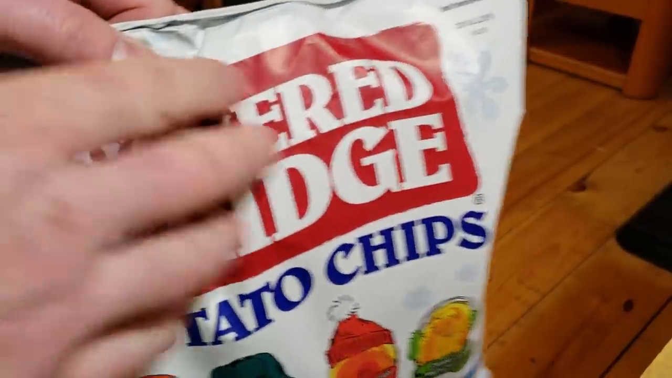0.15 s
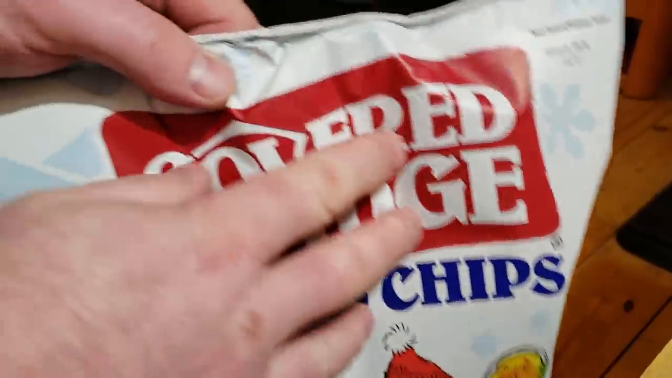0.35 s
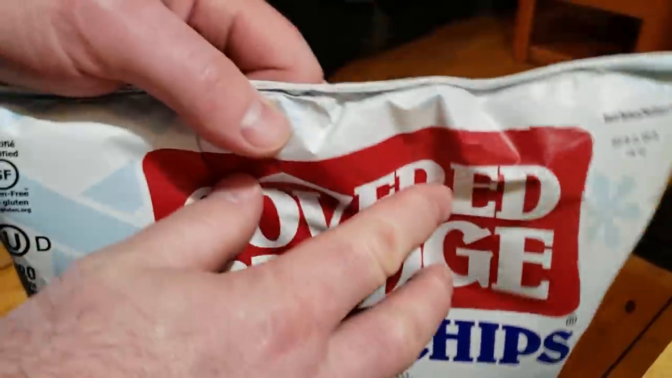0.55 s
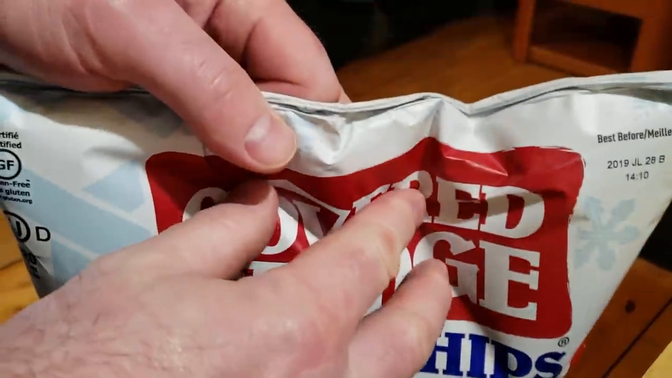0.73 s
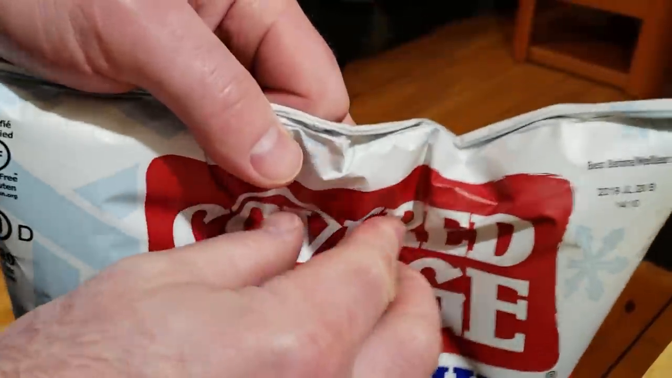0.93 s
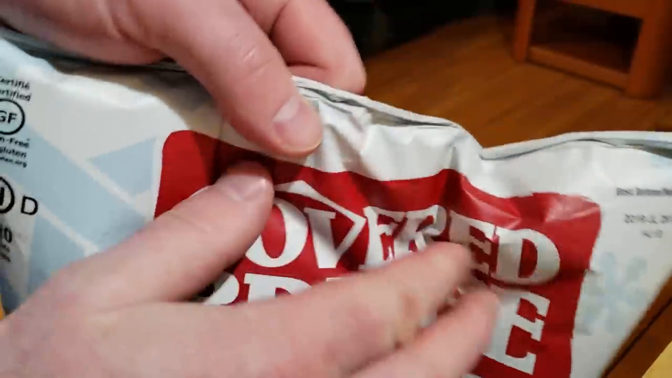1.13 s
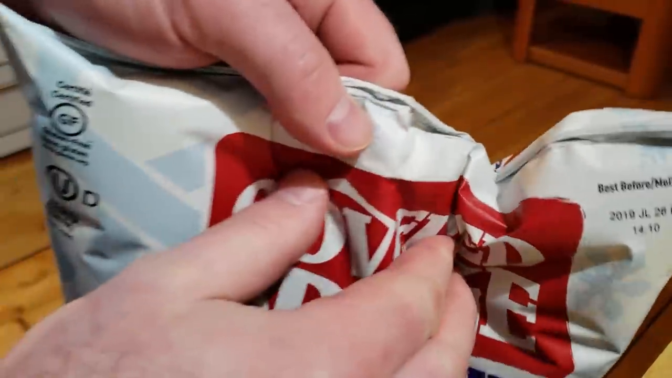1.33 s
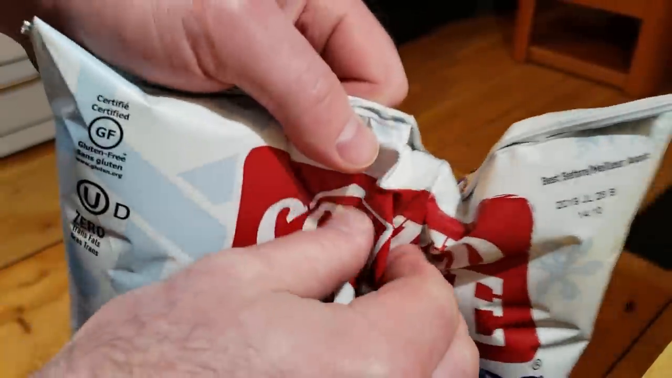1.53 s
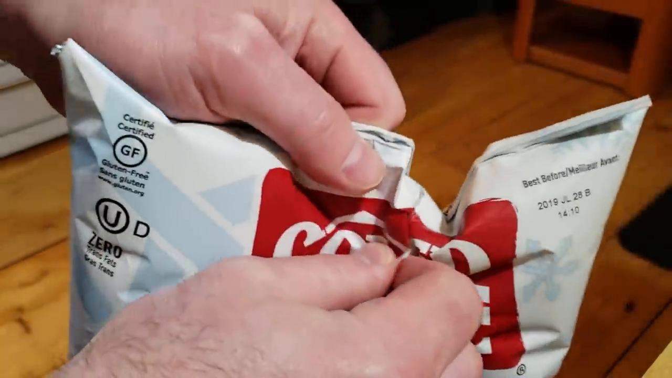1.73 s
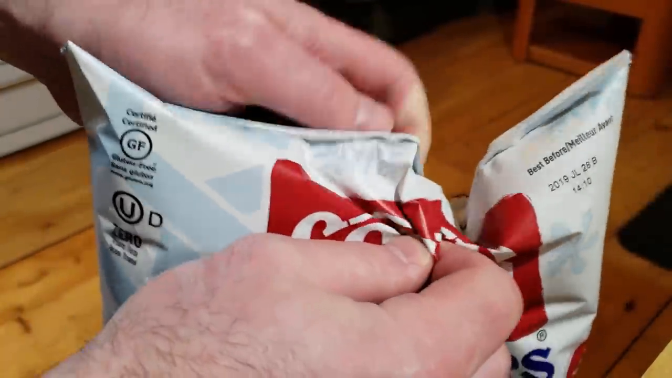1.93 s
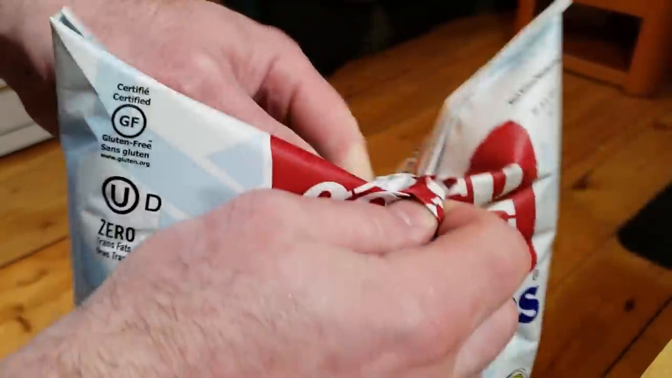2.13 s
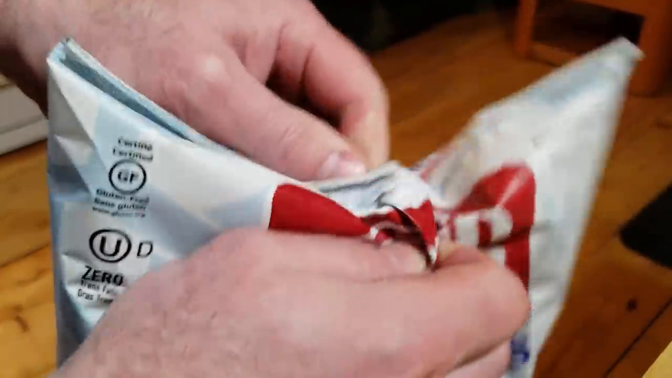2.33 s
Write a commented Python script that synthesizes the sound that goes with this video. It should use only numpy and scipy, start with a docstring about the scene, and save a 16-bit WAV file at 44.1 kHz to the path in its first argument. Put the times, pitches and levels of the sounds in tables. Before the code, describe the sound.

A foil snack bag crinkles close by in a small room as fingers rub and pull it. Sharp snaps and small hollow pops build from 0.2 seconds, loudest around 0.5. After a brief lull near 0.8, uneven crackling resumes and swells again around 2 seconds. Light puffs of air bump the microphone near 0.6 and 1 second, with a stronger thump just after 2, over a faint low rumble.

```python
"""Sharp snaps, hollow pops and fine crinkling: a foil snack bag is gripped and pulled at its sealed top,
close by in a small room. Creases buckle to make the snaps, and the tight, air-filled wall makes the pops.
The crinkling and the rustle of fingers swell and fade with the effort of the hands.
A few puffs of air thump the microphone, each on one side, over a faint low rumble."""
import sys
import numpy as np
from scipy import signal
from scipy.fft import rfft, irfft
from scipy.io import wavfile
from scipy.ndimage import uniform_filter1d

SR = 44100
rng = np.random.default_rng(int(sys.argv[2]) if len(sys.argv) > 2 else 0)


def materialize(psi):
    """Save the field psi as 16-bit PCM at rate SR to the path in sys.argv[1].

    A 1-D psi becomes a single channel; in a 2-D psi each row is a channel.
    """
    bounded = np.clip(np.atleast_2d(psi).T, -1, 1)
    quanta = np.round(bounded * 32767).astype(np.int16)
    wavfile.write(sys.argv[1], SR, quanta)


N = 105840  # 2.4 s

# edges of the bag's four pitch ranges: body, middle, treble and sizzle
BODY_HZ, MIDDLE_HZ, TREBLE_HZ, SIZZLE_HZ, TOP_HZ = 175, 896, 2630, 7950, 16400
RISE_S, EVENT_SAMPLES = 0.00019, 1800  # how fast a snap or puff starts; length of a snap, pop or puff


def undb(db):
    """Turn decibels into a number to multiply by."""
    return 10 ** (np.asarray(db) / 20)


def unit(x):
    """Scale to an average (rms) level of 1."""
    return x / np.sqrt(np.mean(x ** 2))


def pan(db):
    """Left and right gains with a constant total power; positive dB leans left."""
    return unit(undb(np.array([[db], [-db]]) / 2))


def band(x, lo_hz, hi_hz, order=3):
    """Keep the sound between two frequencies."""
    edges_hz = [lo_hz, min(hi_hz, SR / 2 - 10)]
    return signal.sosfilt(signal.butter(order, edges_hz, "band", fs=SR, output="sos"), x)


def colour(x, points):
    """Shape the tone along a curve of (frequency [Hz], gain [dB]) points."""
    hz, db = np.array(points).T
    bin_hz = np.arange(N + 1) * SR / N / 2
    gain = undb(np.interp(np.log(bin_hz + 1), np.log(hz), db))
    return irfft(rfft(x, 2 * N) * gain)[..., :N]


def stereo(n, side=1):
    """Noise for two channels; side 0 makes them alike, 1 unrelated."""
    a, b = rng.standard_normal((2, n))
    return np.array([a + side * b, a - side * b])


def wander(steps_per_s):
    """A smooth random curve with a typical size of 1."""
    hold = int(SR / steps_per_s)
    steps = np.repeat(rng.standard_normal(N // hold + 1), hold)
    return unit(uniform_filter1d(steps, hold)[:N])


def add(out, start_s, x):
    """Mix a short sound into out at the given time."""
    i = int(np.clip(start_s * SR, 0, N - 1))
    out[:, i:i + x.shape[1]] += x[:, :N - i]


def room_rumble():
    """The faint, steady low rumble of the room."""
    return undb(-57.5) * unit(band(stereo(N, side=0.23), 82, 328, order=2))


def room_echo(x, t):
    """The room answers after 5 ms with a short wash of echoes whose treble dies first."""
    age = t[:SR // 2]
    # (low edge [Hz], high edge [Hz], time to fade by 60 dB [s])
    ranges = [(BODY_HZ, SIZZLE_HZ, 0.21), (SIZZLE_HZ, TOP_HZ, 0.11)]
    tail = sum(band(stereo(len(age)), lo, hi) * 1000 ** (-age / fade_s) for lo, hi, fade_s in ranges)
    tail = unit(tail * (age > 0.005)) / np.sqrt(len(age))
    return undb(-16) * signal.fftconvolve(x, tail, axes=1)[:, :N]


def air_puffs(t):
    """Each sudden puff swings the microphone once; one soft gust rumbles on both sides."""
    # puffs of air on the microphone (time [s], level [dB], left minus right [dB])
    puffs = [(0.6029, -17.5, 26), (0.9633, -18.5, -42), (1.0825, -17, -29), (2.0508, -5, -35)]
    out = np.zeros((2, N))
    age = t[:EVENT_SAMPLES]
    phase = 2 * np.pi * 90 * age
    swing = (1 - np.exp(-age / RISE_S)) * np.exp(-age / 0.0023) * (np.sin(phase) - np.cos(phase))
    for start, db, pan_db in puffs:
        add(out, start, undb(db) * pan(pan_db) * swing)
    gust_at_s, gust_width_s = 1.675, 0.018
    gust = unit(band(rng.standard_normal(N), 36.5, 146, order=2))
    swell = np.exp(-0.5 * ((t - gust_at_s) / gust_width_s) ** 2)
    return out + undb(-40.5) * gust * swell


def finger_rubbing(level_db):
    """Fingers drag unevenly on the bag, which answers with a hollow rustle."""
    # tone of fingers rubbing the filled bag (frequency [Hz], gain [dB])
    rub_tone = [(30, -21), (110, -7.5), (270, 0), (420, -12.5), (620, -8.5), (3000, -35)]
    drag = stereo(N, side=0.23) * undb(4.5 * wander(steps_per_s=120))
    return undb(level_db) * unit(colour(drag, rub_tone))


def crease(hz, body_db, sizzle_db, pan_db):
    """One crease buckles: a flat patch rings at its own pitch, foil cracks and flutters, the wall shakes."""
    t = np.arange(EVENT_SAMPLES) / SR
    crack_s, flutter_s, thud_s, ring_s = 0.00032, 0.0044, 0.00063, 0.0063  # fading times
    rise = 1 - np.exp(-t / RISE_S)
    crack = rise * (np.exp(-t / crack_s) + undb(-13.5 + body_db / 2) * np.exp(-t / flutter_s))
    shudder = rise * (np.exp(-t / thud_s) + undb(-2.5) * np.exp(-t / ring_s))

    def burst(envelope, lo_hz, hi_hz, side, order):
        """A burst of noise with as much energy as 1 ms at level 1."""
        x = band(envelope * stereo(len(t), side), lo_hz, hi_hz, order)
        return x / np.sqrt(np.sum(x ** 2, axis=1, keepdims=True) * 1000 / SR)

    body = undb(body_db + 1) * burst(shudder, BODY_HZ, MIDDLE_HZ, side=0.27, order=2)
    middle = undb(body_db + 3) * burst(crack, MIDDLE_HZ, TREBLE_HZ, side=0.61, order=2)
    treble = undb(-3.5) * burst(crack, TREBLE_HZ, SIZZLE_HZ, side=0.91, order=4)
    sizzle = undb(sizzle_db) * burst(crack, SIZZLE_HZ, TOP_HZ, side=0.93, order=4)
    patch = burst(crack, hz / 2 ** 0.2, hz * 2 ** 0.2, side=0.84, order=1)  # 0.4 octave wide
    return body + middle + pan(pan_db) * (treble + sizzle + patch)


def crinkles(level_db):
    """Tiny creases over the hiss of sliding foil: lone ticks at a light touch, dense under a hard grip."""
    ticks_per_s, spread_db = 380, 6.5  # average rate; how much the ticks differ in level
    patch_hz, spread_octaves, pan_db = 4450, 0.69, -2
    ticks = []
    for bright, heavy, left in rng.standard_normal((32, 3)):
        hz = min(patch_hz * 2 ** (spread_octaves * bright), SR / 4)
        ticks.append(crease(hz, -9 + 4 * heavy, -2.5 + 2 * bright, pan_db + 3 * left))
    hiss = unit(pan(pan_db) * band(stereo(N), 1050, 6300, order=1))
    usual_db = np.median(level_db)
    density = undb(np.maximum(level_db, usual_db))
    share_so_far = np.cumsum(density) / np.sum(density)
    out = np.zeros((2, N))
    for when, size, kind in rng.random((int(ticks_per_s * N / SR), 3)):
        start = np.searchsorted(share_so_far, when) / SR
        tick_db = -spread_db * np.log(size + 0.035)  # many quiet ticks, a few loud ones
        add(out, start, undb(tick_db) * ticks[int(kind * len(ticks))])
    crackle = unit(out / np.sqrt(density))  # crowding alone does not make it louder
    slack_db = np.minimum(level_db - usual_db, 0) / 2  # a light touch slides more than it creases
    return undb(level_db) * (undb(4 + slack_db) * crackle + undb(-3.5) * hiss)


def wall_pops():
    """A whole panel flips in one quick swing, then rings for a few cycles on the air in the bag."""
    # hollow pops of the bag's wall (time [s], level [dB], pitch [Hz])
    pops = [(0.3356, -22, 195), (0.4051, -21, 218), (.447, -17.5, 236), (1.0012, -20, 264),
            (1.0631, -20, 520), (1.5012, -20.5, 520), (2.032, -19, 273), (2.09, -24, 335)]
    fade_cycles, flip_pitch_ratio = 1.05, 2.2
    out = np.zeros((2, N))
    for start, db, hz in pops:
        cycles = hz * np.arange(EVENT_SAMPLES) / SR
        flip_cycles = flip_pitch_ratio * cycles
        ring = np.sin(2 * np.pi * cycles) * np.exp(-cycles / fade_cycles)
        flip = undb(-6) * np.sin(2 * np.pi * flip_cycles) * np.exp(-flip_cycles)
        add(out, start, -undb(db) * pan(rng.standard_normal()) * (ring + flip))
    return band(out, BODY_HZ / 2, SIZZLE_HZ, order=2)


def snaps():
    """Loud creases buckle, each with two weaker ones giving way within a few milliseconds of it."""
    # creases that snap (time [s], level [dB], sizzle relative to that level [dB],
    # left minus right for the high parts [dB], pitch of the foil patch [Hz])
    creases = [(0.1859, -24.5, -4, -6, 5700), (0.243, -19.5, 1.5, -0.5, 2960),
               (0.2818, -14.5, -2.5, -3.5, 3970), (0.3237, -15, -3, -4, 3560),
               (0.3546, -12.5, -3.5, -6.5, 4670), (0.4337, -12, 3, -4.5, 7100), (0.447, -20, -8, -14, 7100),
               (0.4746, -17, 0.5, -4, 7500), (0.484, -8, -8, -9, 3730), (0.4864, -17.5, 4.5, -7, 3030),
               (0.4944, -14, 5.5, -3.5, 5200), (0.516, -16.5, -8, -21, 5530), (0.528, -16, -4, -15, 4930),
               (0.5538, -19, -19, -18, 3780), (0.571, -25.5, -13, -6, 4440), (0.5901, -15.5, 3, -11, 3460),
               (0.648, -12.5, 2.5, 2, 5800), (0.6601, -14, 0.5, -1.5, 5700), (0.7132, -23, -29, 2, 3250),
               (0.9053, -23, 3, 6, 6400), (0.9619, -16, -3, -11, 6460), (1.0013, -15, 0, -8, 5840),
               (1.065, -22.5, 3, -4, 5200), (1.084, -17, 5, -1.5, 6030), (1.111, -19.5, -0.5, -7, 4130),
               (1.1396, -19, 4.5, -1, 4900), (1.2099, -15.5, -5, 3, 6050), (1.254, -21, -3.5, 0, 3560),
               (1.3146, -19.5, 3, -9.5, 5400), (1.3945, -25, -19, 0, 4360), (1.4285, -18, -6.5, 3, 1840),
               (1.5526, -22.5, -4.5, -5, 4030), (1.6095, -23, -1, -5, 4200), (1.6254, -24, 3.5, -2, 5700),
               (1.6585, -25, 2.5, -11, 3980), (1.691, -30, -1, 0, 5000), (1.7353, -25, -7, -1, 4500),
               (1.83, -17, -1, -3.5, 4140), (1.901, -21, -3, -5, 5340), (1.907, -19.5, -15, -7, 4960),
               (1.9158, -22.5, 4.5, -5, 6360), (2.0032, -20.5, -1, -8, 4170), (2.0151, -18.5, 3.5, 0, 7000),
               (2.099, -21, 1.5, -9, 2940), (2.137, -21.5, -15, -2, 6360), (2.146, -22, -3, -13, 5430),
               (2.3053, -24, -0.5, -6, 5020)]
    usual_db = np.median(np.array(creases)[:, 1])
    out = np.zeros((2, N))
    for start, db, sizzle_db, pan_db, hz in creases:
        body_db = -9.5 + 0.34 * (db - usual_db)  # big snaps shake the wall, small ones sound thin
        add(out, start, undb(db - 3) * crease(hz, body_db, sizzle_db, pan_db))
        for lag, size in rng.standard_normal((2, 2)):
            neighbour = undb(db - 16 + 2 * size) * crease(hz, body_db, sizzle_db, pan_db)
            add(out, start + 0.003 * (lag + 0.5), neighbour)
    return out


def scene():
    """The handled bag with its echo, the puffs of air and the room's rumble."""
    # effort of the hands (time [s], crinkling level [dB], rubbing level [dB])
    effort = [(0, -47, -40.5), (0.179, -70, -74), (.195, -47, -40.5), (.36, -42.5, -37.5),
              (0.519, -36, -39.5), (0.569, -41, -38), (0.678, -37, -39.5), (.745, -52.5, -55.5),
              (.89, -46, -69), (.98, -49, -54), (1.18, -41.5, -47), (1.37, -48, -53), (1.542, -49, -54.5),
              (1.8, -44.5, -50), (2.08, -38.5, -48.5), (2.24, -47, -62), (2.4, -48, -62)]
    # microphone's colouring of the snaps and crinkles, with a dip near 8.7 kHz (frequency [Hz], gain [dB])
    mic_tone = [(200, 0), (4000, 0.5), (7300, 3), (8700, -4), (13000, 2), (15400, 2), (16300, -16)]
    t = np.arange(N) / SR
    times, crinkle_db, rub_db = np.array(effort).T
    foil = colour(snaps() + crinkles(np.interp(t, times, crinkle_db)), mic_tone)
    bag = foil + wall_pops() + finger_rubbing(np.interp(t, times, rub_db))
    return bag + room_echo(bag, t) + air_puffs(t) + room_rumble()


def record(dry):
    """Flatten any peaks beyond full scale, then cut the very highest treble."""
    treble_cut = signal.ellip(8, 0.2, 70, TOP_HZ, fs=SR, output="sos")
    return signal.sosfilt(treble_cut, np.clip(dry, -1, 1))


dry = scene()
out = record(dry)
materialize(out)
```